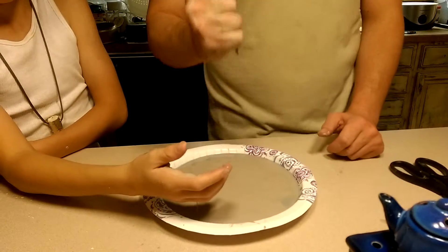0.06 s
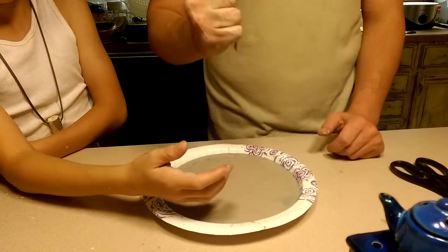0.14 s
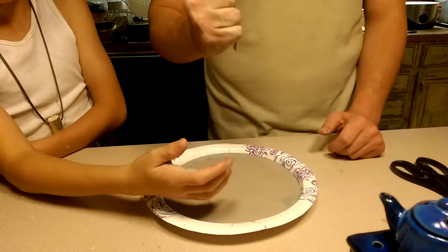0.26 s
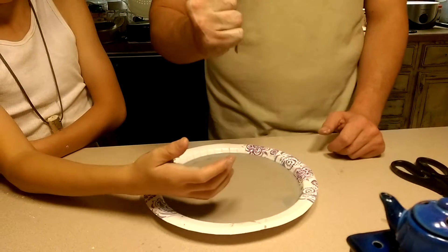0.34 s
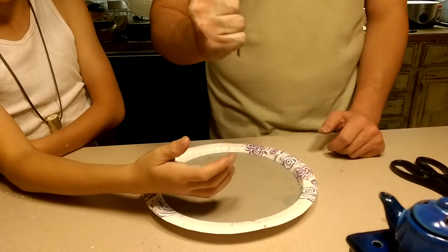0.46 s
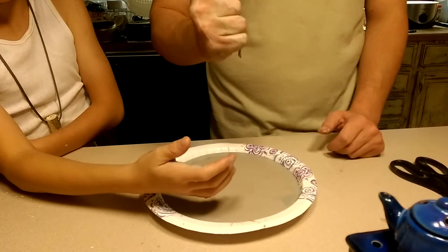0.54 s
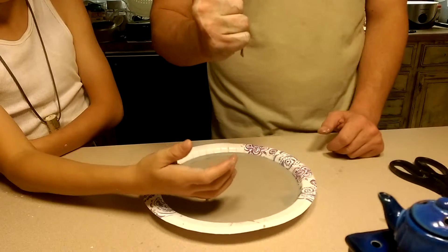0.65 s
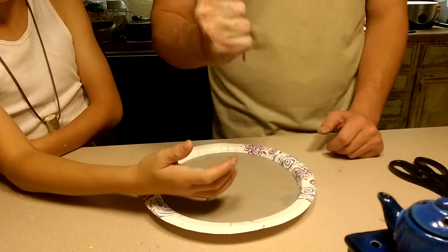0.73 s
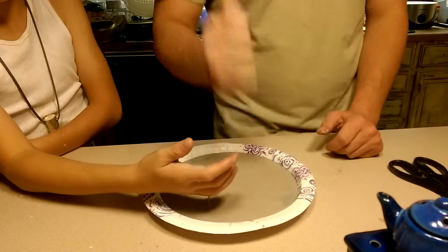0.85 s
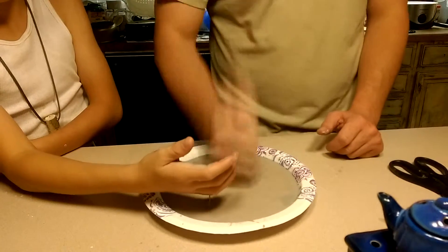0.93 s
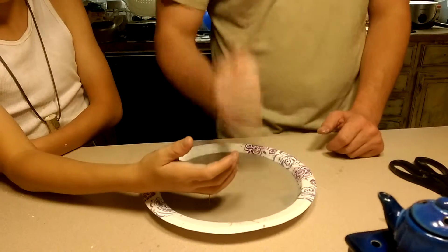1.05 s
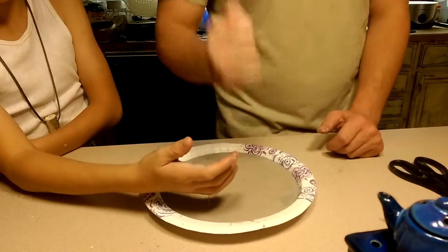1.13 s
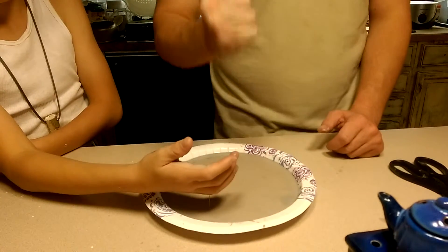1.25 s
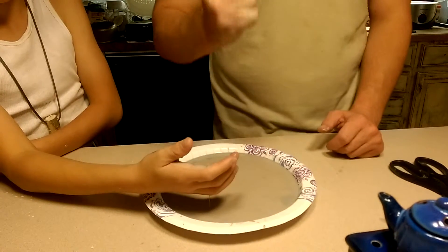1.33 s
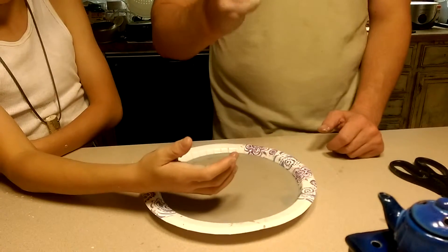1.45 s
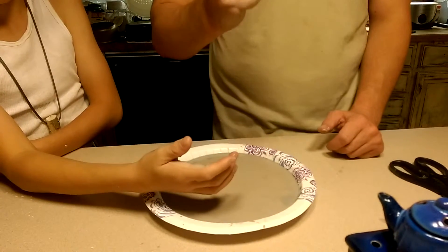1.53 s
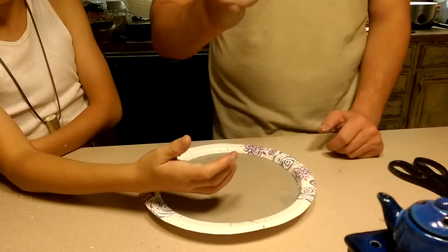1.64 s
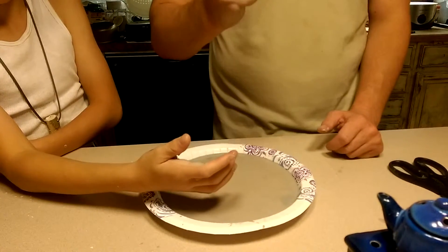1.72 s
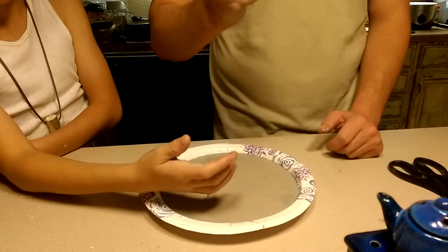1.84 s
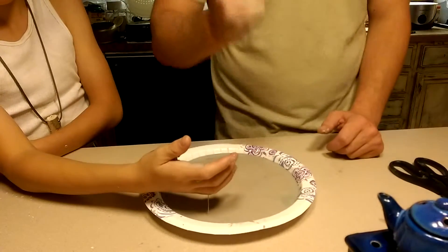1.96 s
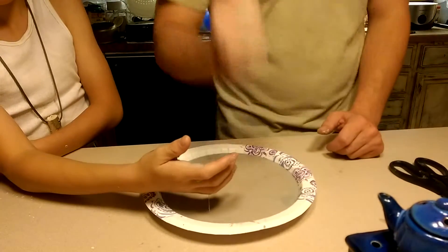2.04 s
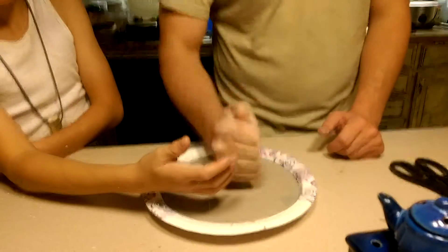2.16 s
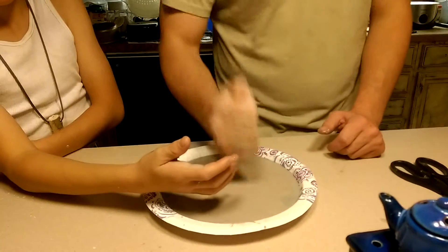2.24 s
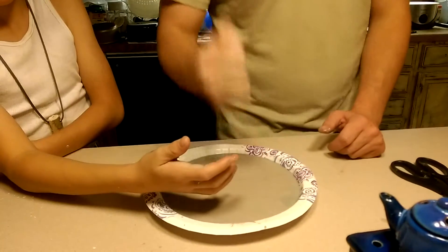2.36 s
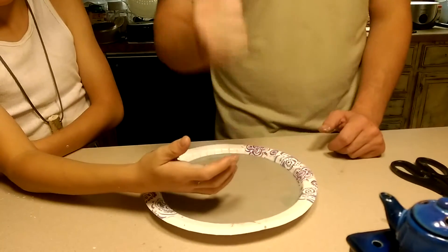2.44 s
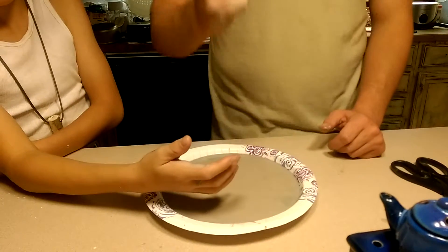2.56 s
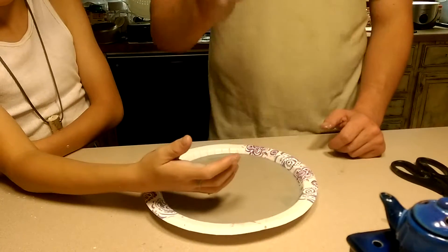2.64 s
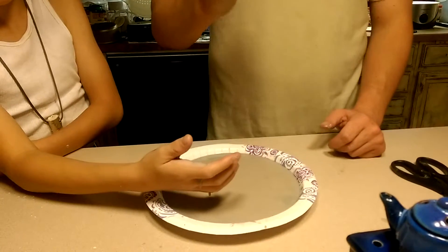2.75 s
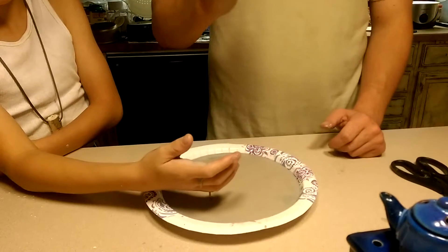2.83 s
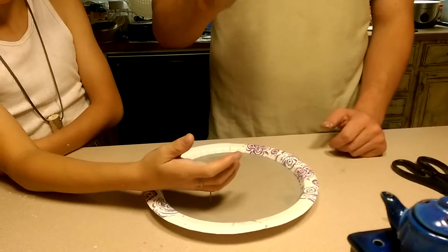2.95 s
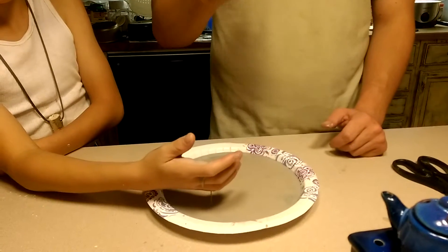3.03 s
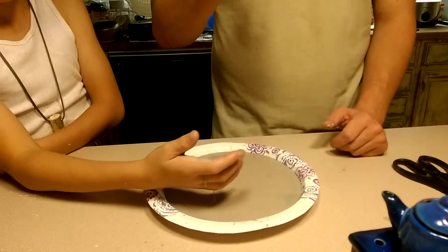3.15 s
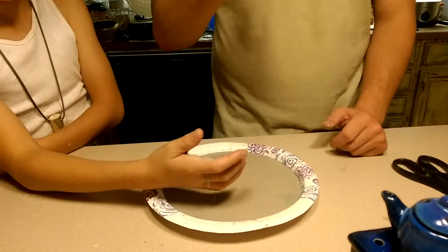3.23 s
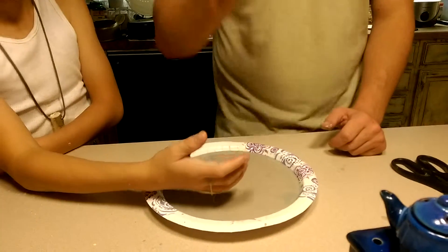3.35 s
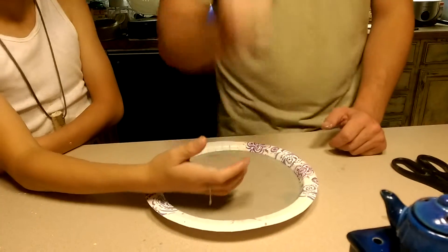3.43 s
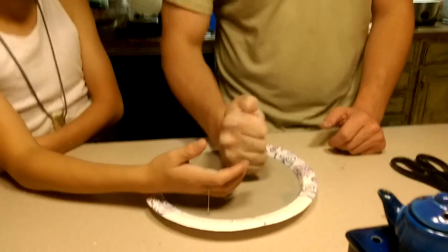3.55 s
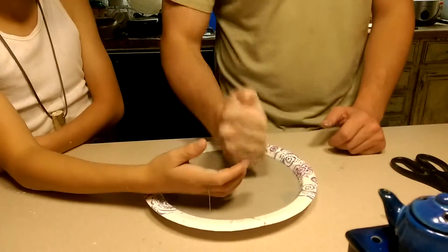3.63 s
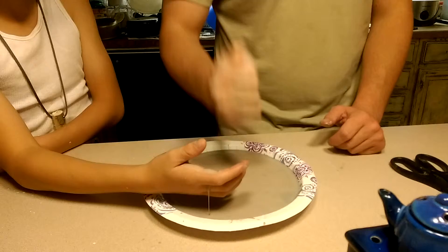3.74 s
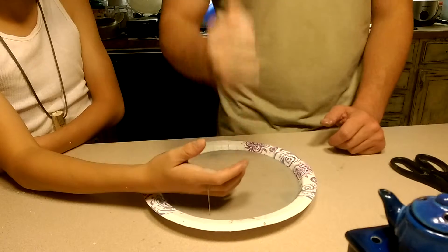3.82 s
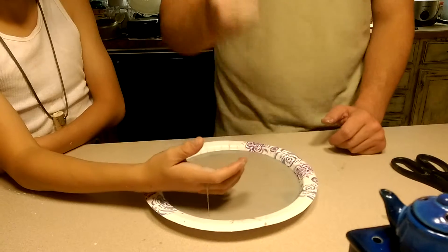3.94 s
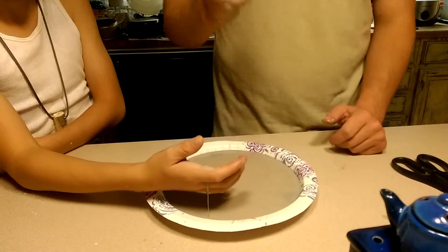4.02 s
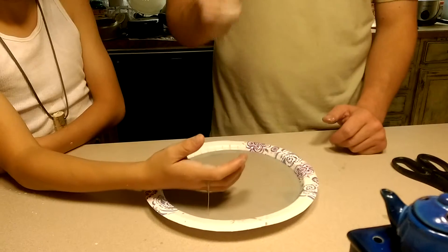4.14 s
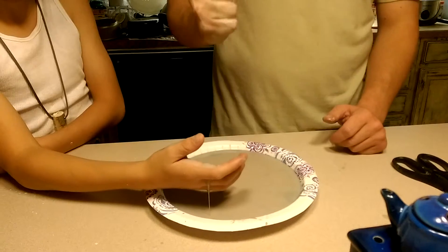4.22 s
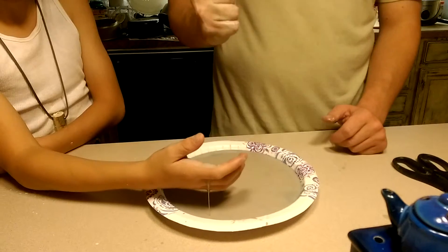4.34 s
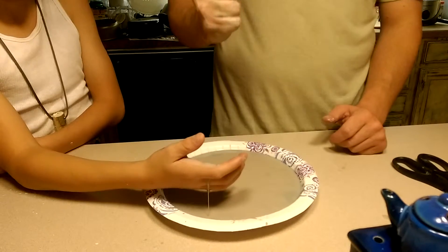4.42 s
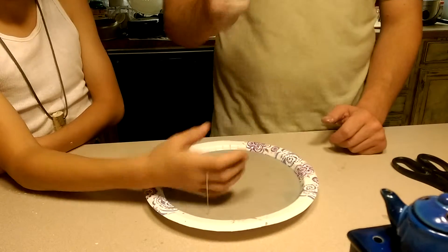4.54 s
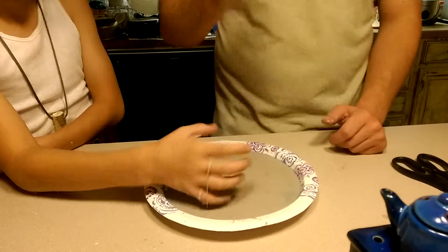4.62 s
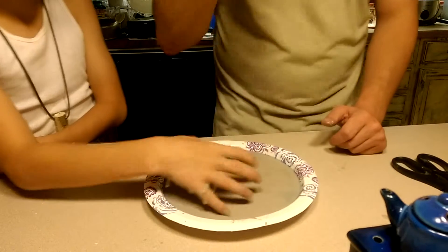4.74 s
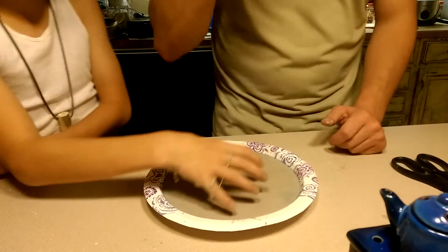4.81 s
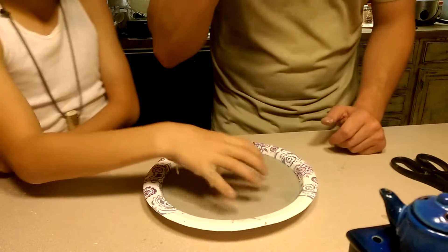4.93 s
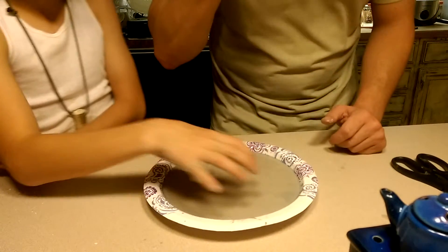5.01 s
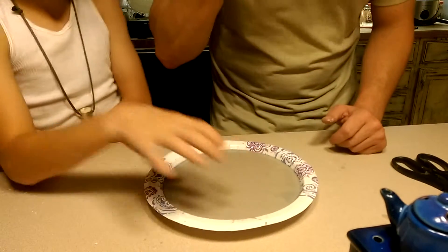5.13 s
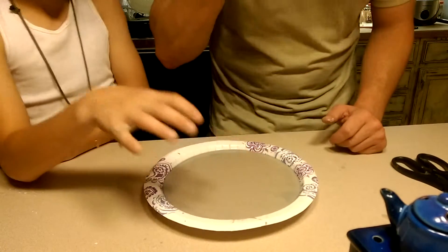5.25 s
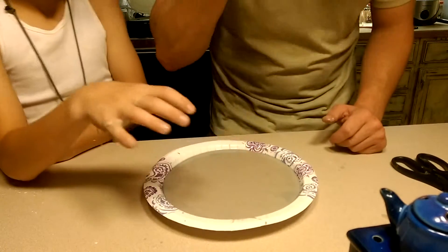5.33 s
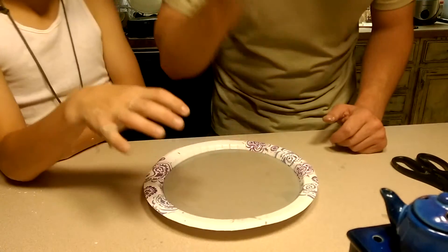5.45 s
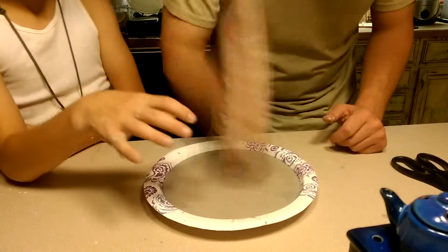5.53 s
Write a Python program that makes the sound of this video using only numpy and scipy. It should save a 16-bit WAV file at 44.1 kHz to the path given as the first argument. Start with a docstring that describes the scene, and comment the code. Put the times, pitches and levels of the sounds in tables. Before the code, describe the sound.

The sound opens on the fading boom and clink of a slap that has just landed. At about 1.0 seconds a hand hits stiff, wet cornstarch paste in a plate with a duller smack and a thump of the counter. Sharper, louder slaps follow at 2.2 and 3.6 seconds, each with a crack, a short wet splatter, a deep thud and a clink of jolted crockery; the last rattles the most. The hard kitchen rings briefly after each blow. From about 3.9 seconds the paste gives small sticky ticks, and wet skin squeaks once, briefly, near 4.2 seconds. Soft pats and dull bumps on the plate continue from 4.1 to 5.5 seconds, clearest around 4.3, 5.1 and 5.5. Clothing rustles faintly with the arm movements, and a faint steady hum and hiss lie underneath. Everything is heard close, in stereo.

```python
"""First comes the boom and clink of a slap just landed: a hand on stiff, wet cornstarch paste in a plate.
Three more follow, about 1.3 s apart. Each cracks, thumps the kitchen counter and jolts the crockery
on it, and the hard room rings on around a stereo pair of microphones. Then come small wet ticks,
one squeak of skin and soft pats and bumps, over rustling cloth and a faint steady hum and hiss."""
import sys
import numpy as np
from scipy import signal
from scipy.fft import rfft, irfft, next_fast_len
from scipy.io import wavfile

SR = 44100
rng = np.random.default_rng(int(sys.argv[2]) if len(sys.argv) > 2 else 0)


def unload_audio(sound):
    """Save the sound as a 16-bit wav file, at the path given as the first command line argument."""
    columns = np.transpose(np.atleast_2d(sound))
    # keep every value between -1 and 1, then stretch to whole-number steps
    steps = np.round(np.clip(columns, -1, 1) * 32767)
    wavfile.write(sys.argv[1], SR, steps.astype(np.int16))


N = 246078
AGE = np.arange(SR) / SR   # seconds since a contact

# Hand on paste. Each row: start in seconds, crack in dB, splatter in dB, its t60 in seconds,
# room in dB, heave of the counter in dB, rebound delay in seconds, rebound in dB.
SLAPS = [(-.40, -22, -35, .26, -26, 2, .09, -18), (1.0353, -28, -28, 0.29, -42, -5, .031, -13),
         (2.2106, -16, -25, 0.38, -23, -1, .089, -19), (3.5918, -16, -24.5, 0.3, -23, -.5, .095, -13)]
# Crockery hops and lands. Each row: start in seconds, gain in dB.
RATTLES = [(-.22, -20.5), (1.0529, -29.5), (1.061, -43), (2.2195, -21.5), (2.2474, -25), (3.2981, -42),
           (3.6, -23), (3.625, -18), (3.63, -25), (3.64, -22), (3.687, -29.5)]
# Sticky paste spits, parts and drips. Each row: start in seconds, level in dB, decay time in seconds.
TICKS = [(1.038, -35, 0.0034), (2.2164, -25, 0.0017), (2.228, -31, .002), (2.364, -46, 0.0078),
         (3.121, -59, 0.007), (3.299, -52.5, 0.013), (3.591, -29, 0.0012), (3.611, -19, 0.0018),
         (3.931, -48, 0.024), (4.078, -46.5, 0.024), (4.137, -48.5, 0.03), (4.168, -52, 0.013),
         (4.413, -52.5, 0.023)]
# Soft pats and bumps. Each row: start in seconds, thud gain in dB, skin in dB, swell time in seconds.
PATS = [(2.411, -53, -41, 0.0075), (4.07, -56, -48, 0.01), (4.155, -44, -51, 0.0084),
        (4.293, -67, -47.5, 0.0094), (4.323, -36.5, -40, 0.014), (4.515, -44.5, -47.5, 0.018),
        (4.655, -40.5, -43.5, 0.018), (5.064, -41.5, -49.5, 0.0081), (5.091, -31.5, -40.5, 0.0051),
        (5.152, -41, -48.5, 0.0047), (5.239, -46.5, -66, 0.0021), (5.345, -46.5, -55.5, .006),
        (5.376, -50.5, -49, 0.01), (5.497, -37, -36.5, 0.0095)]
# An arm swings down or reaches over the plate. Each row: start in seconds, length in seconds, level in dB.
ARM_MOVES = [(2.012, 0.2, -65.5), (3.368, 0.19, -54.5), (4.118, 1.45, -55.5)]

# What rings when struck. Each row: pitch in Hz, relative level in dB, t60 in seconds.
COUNTER_MODES = [(64.9, -2, 0.37), (82.6, -4, 0.61), (111.4, -3, 0.43), (145.4, -3, 0.8),
                 (153.8, -0.5, 0.4), (189.2, 5.5, 0.26), (201.7, -14, 1), (232, -17.5, 1),
                 (255.8, -10, 0.46), (307.7, -19.5, 1), (393.4, -13, 0.15), (477.8, -11.5, 0.37),
                 (505, -17.5, 0.63), (630, -15, 0.77)]   # with the low modes of the room
CROCKERY_MODES = [(1630, -17.5, 0.078), (2260, -20, 0.084), (2430, -12, 0.073), (2580, 1.5, 0.025),
                  (2745, 1.5, 0.015), (2878, -7.5, 0.062), (2950, -14.5, 0.19), (2990, -18, 0.52),
                  (3365, -17.5, 0.23), (4475, -5.5, 0.045), (4600, -25.5, 0.33), (4800, -10.5, 0.043),
                  (5130, -19, 0.15)]
PLATE_MODES = [(83, -17.5, 0.29), (153, -13.5, 0.44), (246, -11.5, 0.09), (285.5, 9, 0.11),
               (313.5, -3, 0.38), (428.5, -2.5, 0.11), (521, -8.5, 0.26)]

# Noise colours at the microphones. Each row: frequency in Hz, relative spectral level in dB.
CRACK_SPECTRUM = [(100, 16.5), (400, 1), (1200, -13), (2500, -5.5), (4500, 1.5), (7000, -6.5), (11000, -11),
                  (16000, -20)]
SPLATTER_SPECTRUM = [(80, -26), (250, 23), (420, 4.5), (900, 4.5), (1600, 0.5), (2800, 2.5), (4500, -8),
                     (6500, -10.5), (10000, -11), (16000, -19)]
SLAP_ROOM_SPECTRUM = [(30, -23), (70, -6), (160, 3.5), (280, 4.5), (420, 0.5), (900, 0), (1300, -3),
                      (2000, -6.5), (2900, -8), (3900, -17.5), (4700, -16.5), (6000, -19.5), (10000, -22.5),
                      (16000, -32)]
CLINK_ROOM_SPECTRUM = [(300, -27), (1500, -1.5), (2600, 2), (3300, -0.5), (3900, -6.5), (4700, -11),
                       (6500, -10), (16000, -29)]
TICK_SPECTRUM = [(300, 2.5), (1500, 3), (3000, 2.5), (4500, -1), (7000, -7.5), (11000, -12.5), (16000, -25)]
SKIN_SPECTRUM = [(50, -23), (120, -12.5), (200, 5.5), (350, -3.5), (620, 0), (1050, -3.5), (1500, -17),
                 (2500, -23), (7000, -42), (16000, -54)]
CLOTH_SPECTRUM = [(60, -1), (150, 8), (300, 5), (600, 8), (1300, 1), (2100, 5.5), (3200, -4.5), (6000, -14),
                  (16000, -24.5)]
HUM_SPECTRUM = [(20, -17), (45, -9.5), (80, 1), (115, -9), (152, 6.5), (200, -10), (245, 5), (420, -10),
                (600, -10.5), (1300, -18), (4300, -14), (6300, -26), (15500, -28)]

# Narrow resonances. Each row: centre in Hz, width in Hz, lift in dB.
CROCKERY_PEAKS = [(745, 11, -9), (869, 40, 7), (1150, 31, 2.5), (1350, 15, 2.5), (2440, 66, -2),
                  (2760, 62, 1), (2953, 35, 11), (3390, 55, 11), (4644, 120, 8.5), (5140, 35, 0)]   # plate and crockery colour what the room returns
POCKET_PEAKS = [(3980, 200, 11.5), (4900, 200, 2.5)]   # small pockets in the paste colour its ticks

# The kitchen's reverberation. Each row: frequency in Hz, t60 in seconds.
KITCHEN_T60 = [(60, 1.4), (250, 0.9), (1000, 0.777), (3000, 0.76), (5500, 0.8), (8000, .5), (15000, 0.5)]
# What the two microphones share of the room. Each row: frequency in Hz, correlation from 0 to 1.
MIC_LIKENESS = [(60, 0.8), (290, .9), (640, 0.6), (1400, 0), (16000, 0)]
# Balance between the microphones. Each row: frequency in Hz, left minus right in dB.
DIRECT_PAN = [(100, 0), (1000, 2), (2000, -2), (4000, 6), (7500, 5), (13000, -8)]
DIFFUSE_PAN = [(100, -0.5), (500, -1.5), (1000, -0.1), (2200, -5.5), (4200, -2.5), (8000, -1.5),
               (13000, -6)]
HUM_PAN = [(100, 1), (700, 1), (2400, -2.5), (4400, -5), (8000, 1.5), (15000, -1.5)]


def slaps(crack_t60=0.015):
    """Air cracks out from under the palm, paste splatters, the room answers."""
    out = np.zeros((2, N))
    for s, crack_db, splatter_db, splatter_t60, room_db, *_ in SLAPS:
        crack = noise(CRACK_SPECTRUM, direct=0.53) * dying(crack_t60)
        wet = grains(depth_db=3, per_s=900)
        splatter = noise(SPLATTER_SPECTRUM, direct=0.25) * wet * dying(splatter_t60)
        room = kitchen(SLAP_ROOM_SPECTRUM, build_s=0.0055, peaks=CROCKERY_PEAKS)
        add(out, s, from_db(crack_db) * crack + from_db(splatter_db) * splatter + from_db(room_db) * room)
    return out


def thumps(lag_s=0.0014):
    """Just after each crack the counter takes the blow, then a gentler rebound."""
    out = np.zeros((2, N))
    for s, *_, heave_db, rebound_s, rebound_db in SLAPS:
        stiffening = 0.7 + 0.17 * heave_db   # a softer blow stiffens the paste less
        add(out, s + lag_s, from_db(heave_db) * thump(heave_db, stiffening))
        add(out, s + lag_s + rebound_s, from_db(rebound_db) * thump(heave_db, 0.65 * stiffening))
    return out


def thump(force_db, stiffening, relax_s=0.004, build_s=0.014, boom_db=-18.5):
    """The paste locks solid under a hard blow, so the counter's heave starts high and sags in pitch."""
    # A softer blow is lower, swells more slowly and favours the low modes.
    heave_hz = 122.5 + 2.5 * force_db
    peak_s = (0.65 - 0.05 * force_db) / heave_hz
    modes = [(hz, db + 0.8 * force_db * np.log2(hz / heave_hz), t60) for hz, db, t60 in COUNTER_MODES]
    turns = np.cumsum(heave_hz * (1 + stiffening * np.exp(-AGE / relax_s))) / SR
    heave = swell(peak_s) ** 2.15 * np.sin(2 * np.pi * turns)
    boom = ring(modes, scatter_db=7, spread=0.11) * (1 - np.exp(-AGE / build_s))
    return heave + from_db(boom_db) * boom


def rattles(room_db=-15):
    """Jolted crockery clinks briefly on the counter; the room carries its pitches on."""
    out = np.zeros((2, N))
    for s, db in RATTLES:
        clink = ring(CROCKERY_MODES, scatter_db=1.2, spread=1.2)
        room = kitchen(CLINK_ROOM_SPECTRUM, peaks=CROCKERY_PEAKS)
        add(out, s, from_db(db) * (clink + from_db(room_db) * room))
    return out


def ticks():
    """Sticky paste crackles in short clusters; the longer ones stir the room more."""
    out = np.zeros((2, N))
    for s, db, decay_s in TICKS:
        wet = grains(depth_db=4.5, per_s=610)
        crackle = noise(TICK_SPECTRUM, direct=0.17, peaks=POCKET_PEAKS) * wet * np.exp(-AGE / decay_s)
        room = from_db(-2) * np.sqrt(decay_s) * kitchen(TICK_SPECTRUM)
        add(out, s, from_db(db) * (crackle + room))
    return out


def pats(room_db=-11):
    """A soft contact presses in slowly: a dull thud from the plate and a brush of skin."""
    out = np.zeros((2, N))
    for s, thud_db, skin_db, swell_s in PATS:
        thud = ring(PLATE_MODES, scatter_db=8.5, spread=0.27) * (1 - np.exp(-AGE / swell_s))
        skin = noise(SKIN_SPECTRUM) * swell(swell_s)
        room = from_db(room_db) * kitchen(SKIN_SPECTRUM, build_s=0.014)
        add(out, s, from_db(thud_db) * thud + from_db(skin_db) * (skin + room))
    return out


def squeak(peak_s=4.165, peak_db=-36.5, end_hz=2750, sag_hz_per_s=9000, attack_s=0.0093, release_s=0.017):
    """Wet skin slips unsteadily: a narrow, rough band of sound whose pitch falls until the skin lets go."""
    t = np.arange(N) / SR - peak_s
    before, after = np.maximum(-t, 0), np.maximum(t, 0)
    jitter = rng.standard_normal((2, N)) + 1j * rng.standard_normal((2, N))
    slip = signal.sosfilt(signal.butter(2, 130, fs=SR, output="sos"), jitter)
    turns = np.cumsum(end_hz + sag_hz_per_s * before) / SR
    band = np.real(slip * np.exp(2j * np.pi * turns))
    envelope = np.exp(-before / attack_s - after / release_s)
    return from_db(peak_db) * envelope * band / band.std()


def cloth(fidget_db=-68, attack_s=0.058, release_s=0.1):
    """Cloth rustles with the arm: each move swells, holds and fades, above a faint fidgeting."""
    t = np.arange(N) / SR
    power = from_db(fidget_db) ** 2
    for s, length_s, db in ARM_MOVES:
        rise = np.clip((t - s) / attack_s, 0, 1)
        fade = np.exp(-np.maximum(t - s - length_s, 0) / release_s)
        power = power + (from_db(db) * rise * fade) ** 2
    return np.sqrt(power) * noise(CLOTH_SPECTRUM, size=next_fast_len(N))[:, :N]


def kitchen(spectrum, build_s=0.0022, peaks=()):
    """Reflections from farther off in the room thicken, then die octave by octave, the treble first."""
    source = rfft(noise(spectrum, peaks=peaks))
    hz = np.arange(source.shape[-1])
    centres = np.geomspace(60, 15000, 9)
    out = 0
    for centre, share in zip(centres, np.eye(len(centres))):
        octave = irfft(source * at_hz(np.c_[centres, share], hz), SR)
        out = out + octave * dying(at_hz(KITCHEN_T60, centre))
    return out * (1 - np.exp(-AGE / build_s))


def hum(level_db=-58):
    """Room tone: a faint steady hum and hiss behind everything."""
    return from_db(level_db) * noise(HUM_SPECTRUM, HUM_PAN, size=next_fast_len(N))[:, :N]


def noise(spectrum, pan=DIFFUSE_PAN, direct=0, size=SR, peaks=()):
    """Noise of rms 1; both microphones hear the direct share alike, diffuse sound only in the bass."""
    hz = np.arange(size // 2 + 1) * SR / size
    sides = np.array([[1], [-1]])
    mid, side = rfft(rng.standard_normal((2, size)))
    alike = np.clip(at_hz(MIC_LIKENESS, hz), direct, 1)
    pair = np.sqrt(1 + alike) * mid + np.sqrt(1 - alike) * side * sides
    lean_db = direct * at_hz(DIRECT_PAN, hz) + (1 - direct) * at_hz(pan, hz)
    peaks_db = sum(db / (1 + (2 * (hz - centre) / width) ** 2) for centre, width, db in peaks)
    sound = irfft(pair * from_db(at_hz(spectrum, hz) + peaks_db + sides * lean_db / 2), size)
    return sound / sound.std()


def ring(modes, scatter_db, spread):
    """Struck modes; at each microphone phase strays by spread radians, level by spread * scatter_db."""
    out = 0
    for hz, db, t60 in modes:
        gain = from_db(db + spread * scatter_db * rng.standard_normal((2, 1)))
        phase = spread * rng.standard_normal((2, 1))
        out = out + gain * dying(t60) * np.sin(2 * np.pi * hz * AGE + phase)
    return out


def grains(depth_db, per_s):
    """Uneven gain of many tiny wet contacts, rms 1."""
    steps = from_db(depth_db * np.clip(rng.standard_normal(SR), -2, 2))
    gain = np.interp(AGE * per_s, np.arange(SR), steps)
    return gain / np.sqrt(np.mean(gain ** 2))


def dying(t60):
    """Falls by 60 dB in t60 seconds."""
    return np.exp(-np.log(1000) * AGE / t60)


def swell(peak_s):
    """Rises to 1 at peak_s and sinks away."""
    return AGE / peak_s * np.exp(1 - AGE / peak_s)


def from_db(db):
    """Decibels to amplitude."""
    return 10 ** (np.asarray(db) / 20)


def at_hz(points, hz):
    """Reads a table along a log-frequency axis."""
    known, values = np.transpose(points)
    return np.interp(np.log(np.maximum(hz, 1)), np.log(known), values)


def add(track, s, sound):
    """Mixes a sound into the track from s seconds on."""
    start = round(s * SR)
    first, last = max(start, 0), min(start + sound.shape[-1], N)
    track[:, first:last] += sound[..., first - start:last - start]


def scene():
    """What reaches the microphones: the contacts at the counter in front, cloth and room tone behind."""
    return slaps() + thumps() + rattles() + ticks() + squeak() + pats() + cloth() + hum()


def record(dry, cutoff_hz=15700):
    """After the microphones, the loudest peaks are rounded off and the top is cut."""
    rounded = dry / (1 + dry ** 8) ** (1 / 8)
    lowpass = signal.ellip(10, 0.1, 80, cutoff_hz, fs=SR, output="sos")
    return signal.sosfilt(lowpass, rounded)


dry = scene()
out = record(dry)
unload_audio(out)
```